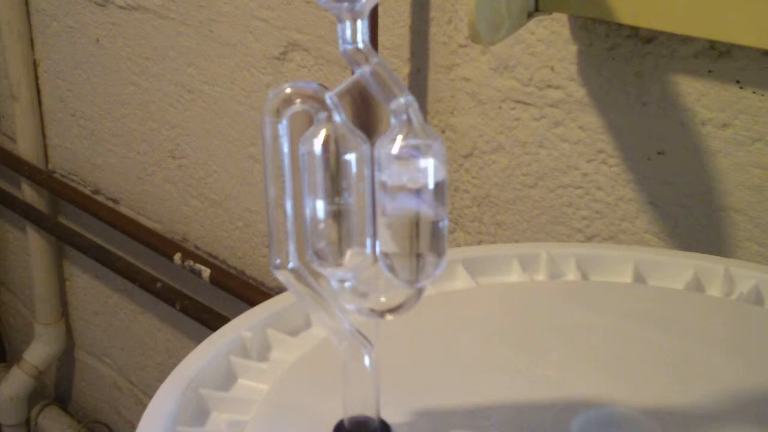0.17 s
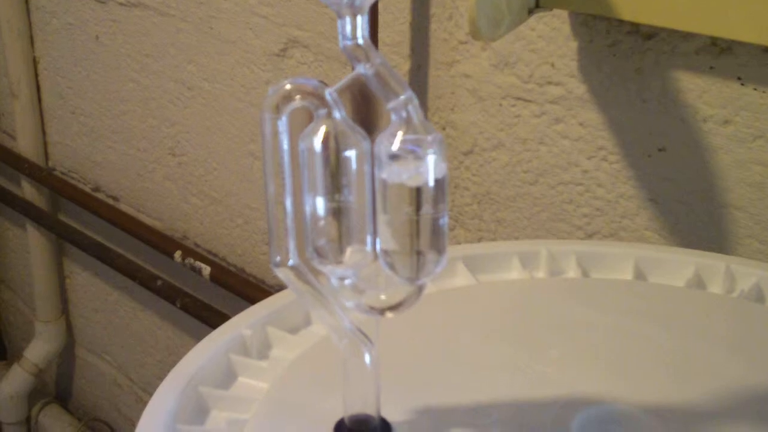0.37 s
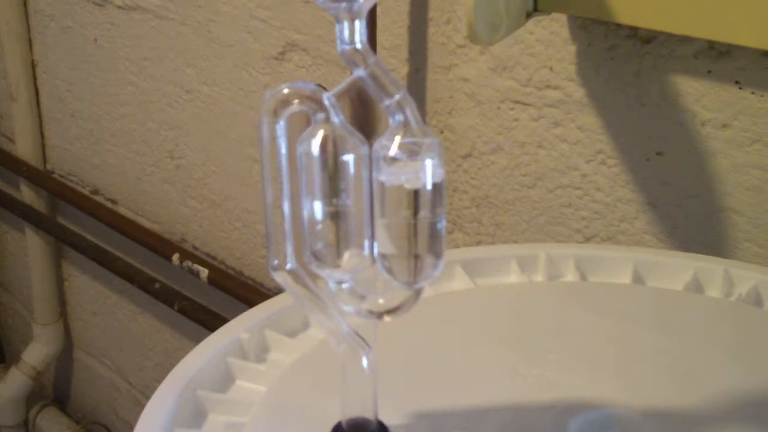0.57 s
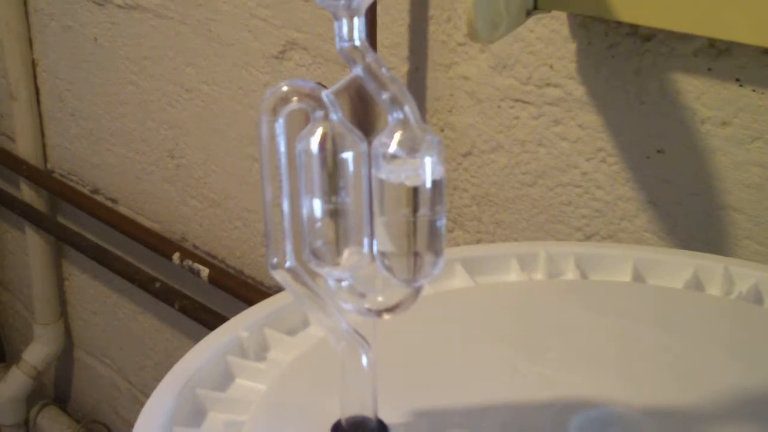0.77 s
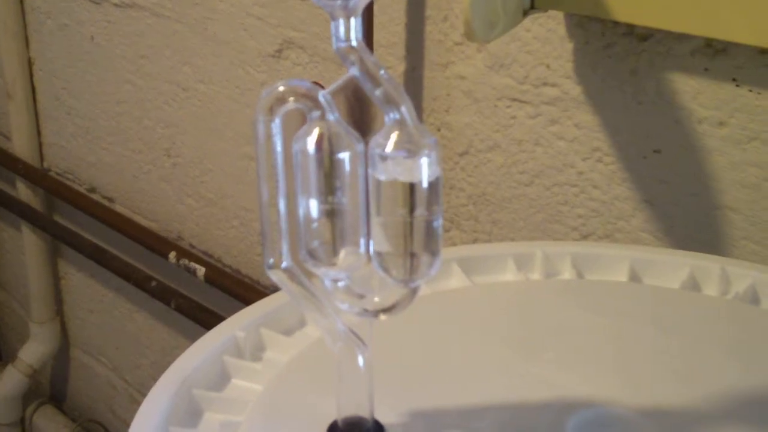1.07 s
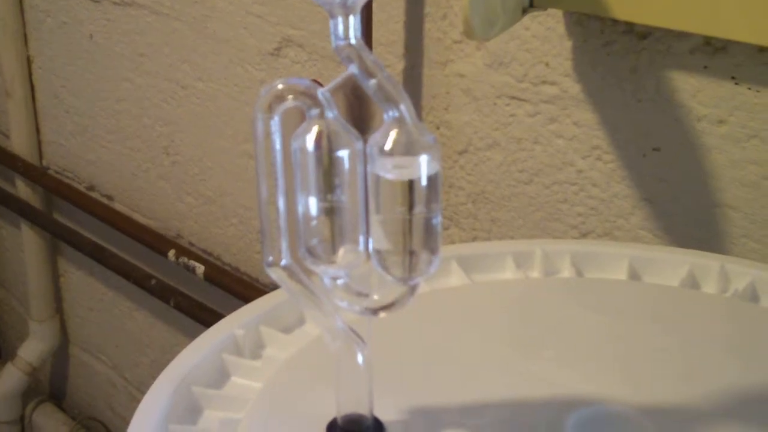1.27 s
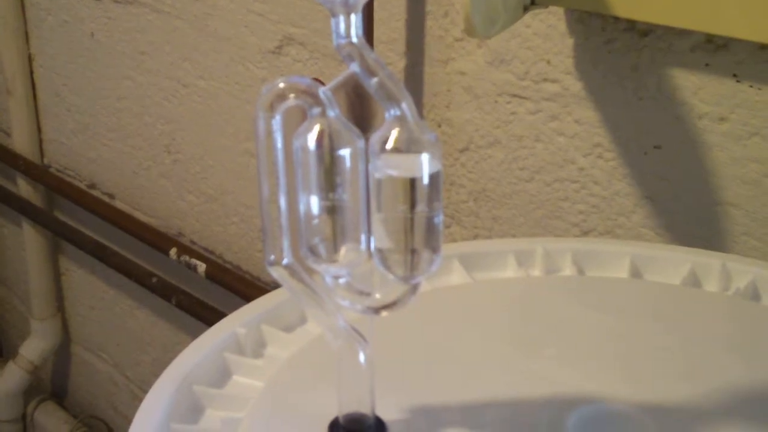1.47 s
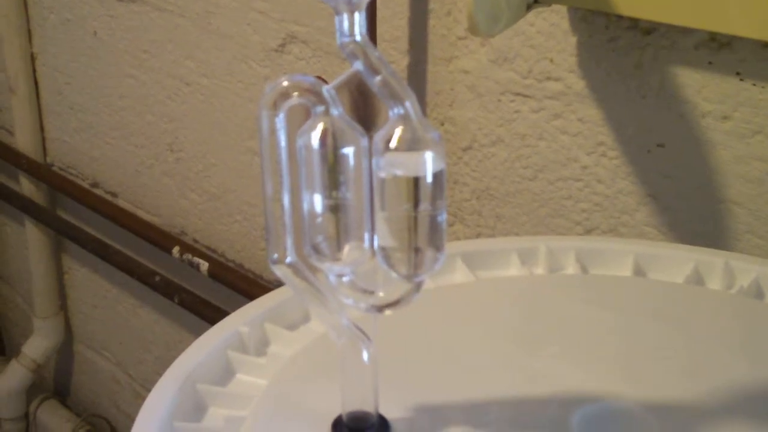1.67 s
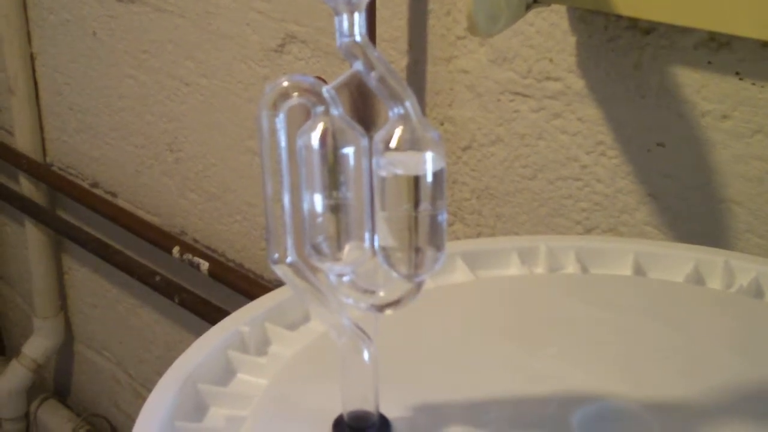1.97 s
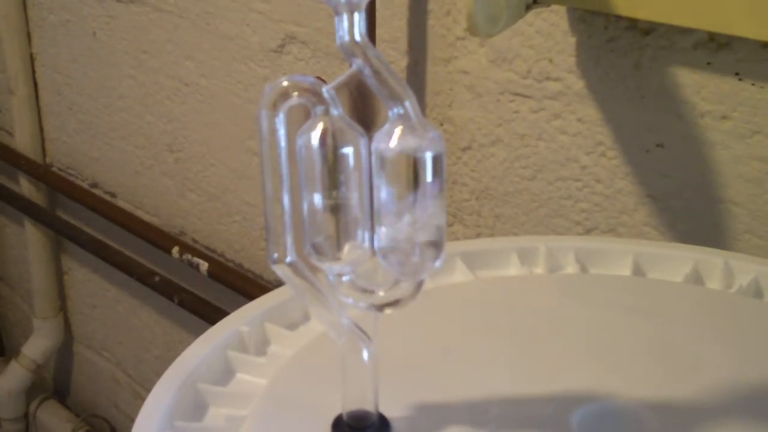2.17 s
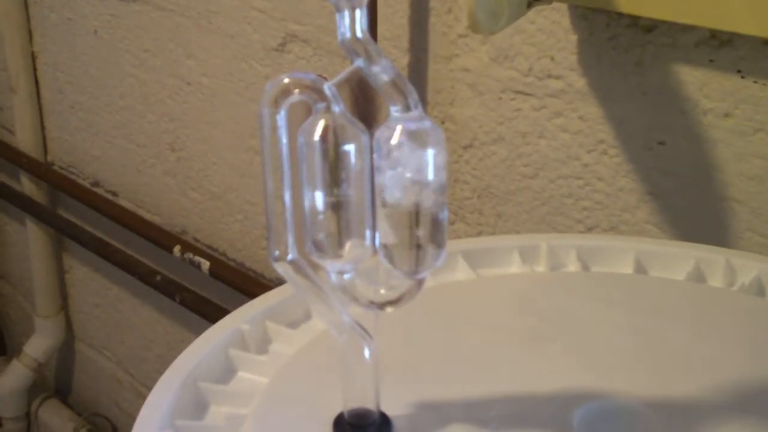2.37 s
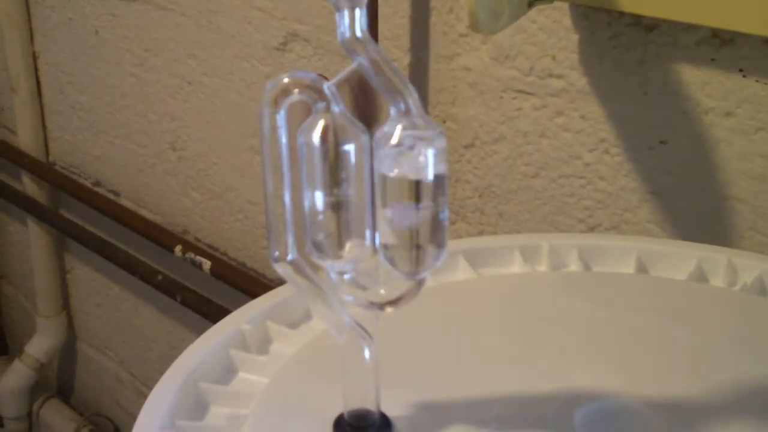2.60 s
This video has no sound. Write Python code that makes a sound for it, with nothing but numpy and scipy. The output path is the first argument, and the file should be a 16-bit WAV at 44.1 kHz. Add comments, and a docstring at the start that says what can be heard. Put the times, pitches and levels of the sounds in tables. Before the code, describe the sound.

A quick bubbling glug from a bucket's water trap, late in a quiet indoor utility room; beforehand only steady low rumble, thin electronic whine and ticking camera motor, heard through a small built-in mono microphone.

```python
"""Airlock burp over machine rumble

Gas leaves a fermenting bucket once: decaying low sines for the lid, rising sines for bubbles and froth.
A lens motor ticks and whirs as pulsed noise through body resonances; electronics add sines and hiss.
Shaped noise and narrow hums make the steady utility room. A small camera listens in mono, and the two
channels carry opposite offsets from the moment the sound switches on."""
import sys
import numpy as np
from scipy import signal
from scipy.fft import rfft, irfft
from scipy.io import wavfile

SR = 44100
rng = np.random.default_rng(int(sys.argv[2]) if len(sys.argv) > 2 else 0)


def invert_db(level):
    """Linear amplitude ratio for a level in decibels (20 dB per decade), elementwise."""
    return 10 ** (np.asarray(level, dtype=float) / 20)


def file_out(sig):
    """Save sig as 16-bit WAV at sys.argv[1]."""
    # one column per channel
    cols = np.atleast_2d(sig).T
    # limit, then scale
    lim = np.clip(cols, -1, 1)
    pcm = np.round(lim * 32767).astype(np.int16)
    wavfile.write(sys.argv[1], SR, pcm)


N = 120834  # samples
FRAMES_PER_S, FRAME_START_S = 29.97, .008  # the camera's frame clock


def rms_one(x):
    """Normalization: scale to unit root-mean-square."""
    return x / np.sqrt(np.mean(x ** 2) + 1e-20)


def drift(rate):
    """Low-pass random process: slow fluctuation with unit spread, computed every 40 samples."""
    r = np.exp(-80 * np.pi * rate / SR)
    noise = rng.standard_normal(N // 40 + 2002)
    slow = signal.lfilter([1], [1, -2 * r, r * r], noise)[2000:]  # the filter has settled
    return np.interp(np.arange(N) / 40, np.arange(len(slow)), rms_one(slow))


def resonate(x, hz, width):
    """Damped resonance: a two-pole filter with unit gain at its peak."""
    r = np.exp(-np.pi * width / SR)
    zeros = [(1 - r * r) / 2, 0, (r * r - 1) / 2]
    poles = [1, -2 * r * np.cos(2 * np.pi * hz / SR), r * r]
    return signal.lfilter(zeros, poles, x)


def body(x, peaks):
    """Modal superposition: parallel resonances, each passed twice, with alternating signs."""
    out = 0
    for k, (hz, width, db) in enumerate(peaks):
        mode = resonate(resonate(x, hz, width), hz, width)
        out = out + (-1) ** k * invert_db(db) * mode
    return out


def blips(rows, rise_s, t60_of, glide):
    """Damped free oscillation: sines swell and decay; frequency rises by 2 * glide of itself per second."""
    age = np.arange(SR // 2) / SR
    swell = 1 - np.exp(-(age / rise_s) ** 2)
    out = np.zeros(N + SR)
    for s, db, hz in rows:
        start = int(s * SR)
        decay = invert_db(db - 60 * age / t60_of(hz))
        tone = np.sin(2 * np.pi * hz * age * (1 + glide * age))
        out[start:start + len(age)] += decay * swell * tone
    return out[:N]


# Glugs of gas leaving the bucket: t/s, level/dB (before swell and decay), f/Hz
GLUG_EVENTS = [(2.230, -21, 152), (2.263, -46, 155), (2.284, -18.5, 156), (2.304, -21.5, 170),
               (2.334, -23.5, 170.6), (2.367, -18.5, 141.6), (2.393, -25, 143), (2.407, -18.5, 144),
               (2.437, -29, 157), (2.486, -26.5, 146)]


def bucket_lid():
    """Damped oscillation at constant frequency: low glugs of the bucket lid."""
    rise_s, t60_s = .007, .105
    return blips(GLUG_EVENTS, rise_s, lambda hz: t60_s, 0)


# Bubbles in the airlock chamber: t/s, level/dB (before swell and decay), starting f/Hz
BUBBLE_EVENTS = [(2.180, -28, 400), (2.200, -27, 686), (2.222, -28, 622), (2.236, -40, 388),
                 (2.283, -30, 1050), (2.287, -31.5, 384), (2.288, -26, 1275), (2.303, -32, 600),
                 (2.306, -28, 756), (2.320, -36, 907), (2.362, -27, 706), (2.378, -42, 544),
                 (2.412, -29, 558), (2.436, -42, 637)]
# Froth of small random bubbles: start t/s, length t/s, lowest f/Hz, highest f/Hz
FROTH = [(2.19, .055, 450, 900), (2.278, .04, 650, 1600), (2.352, .075, 480, 1000)]


def water_trap():
    """Bubble resonance with constant decay in cycles: clear bubbles and bursts of froth in the airlock."""
    rise_s, cycles_to_60_db, glide_per_s = .008, 45.0, .5
    froth_db, spread_db = -37.5, 1  # spread per natural-log unit of size
    froth = []
    for s, length, low_hz, high_hz in FROTH:
        for when, size, pitch in rng.random((24, 3)):
            db = froth_db + spread_db * np.log(size)
            hz = low_hz * (high_hz / low_hz) ** pitch
            froth.append((s + length * when, db, hz))
    return blips(BUBBLE_EVENTS + froth, rise_s, lambda hz: cycles_to_60_db / hz, glide_per_s)


# Lens motor runs: start t/s, length t/s
MOTOR_RUNS = [(.408, .645), (1.140, .027), (1.258, .028), (1.349, .166), (1.558, .022), (1.747, .035),
              (1.858, .027), (1.958, .024), (2.255, .029), (2.350, .085), (2.556, .029)]
# Camera body driven by the running motor: f/Hz, width/Hz (each pass), relative level/dB
RUNNING_MODES = [(6300, 800, -8), (7780, 400, -4), (8280, 500, 0), (9350, 800, -11), (11050, 1100, -3.5),
                 (12750, 600, 3), (14050, 700, -13)]
# Lag of each of those resonances within a step: t/s
MODE_LAGS = [.005, .001, .001, .007, .006, .0007, .0005]


def motor_running():
    """Amplitude modulation: steps and their teeth pulse the noise that drives the body resonances."""
    run_db, edge_s, steps_per_s = -50.5, .003, 134
    step_depth_db, teeth_depth_db = 5.5, 3.0
    t = np.arange(N) / SR
    gate = 0
    for s, length in MOTOR_RUNS:
        gate = gate + np.clip(np.minimum(t - s, s + length - t) / edge_s + .5, 0, 1)
    turn = 2 * np.pi * steps_per_s * (t - np.c_[MODE_LAGS])  # one row per resonance
    step_db = step_depth_db * np.cos(turn)
    teeth_db = teeth_depth_db * np.cos(3 * turn)  # three teeth a step
    rattle = invert_db(step_db + teeth_db + 0.5 * drift(65)) * rng.standard_normal(N)
    modes = sum((-1) ** k * body(rattle[k], [peak]) for k, peak in enumerate(RUNNING_MODES))
    return invert_db(run_db) * gate * rms_one(modes)


# Ticks after the start of each frame, before jitter: t/s
FRAME_TICKS = [0, .0075, .0125, .023]
# Camera body under the idling motor: f/Hz, width/Hz (each pass), relative level/dB
IDLING_MODES = [(6140, 1230, -3.5), (7780, 1050, -2), (8400, 750, -1), (9290, 540, -6.5), (11100, 1750, -8),
                (12850, 1550, -1), (13700, 600, -32)]


def motor_idling():
    """Impulsive excitation: decaying ticks in every frame modulate noise through the body resonances."""
    idle_db, jitter_s = -55, .0012
    tick_db, tick_spread_db, tick_t60_s = 10.5, 3.5, .0067  # tick level relative to the steady noise
    frames = FRAME_START_S + np.arange(83) / FRAMES_PER_S
    at = (frames[:, None] + FRAME_TICKS).ravel()
    at = at + jitter_s * rng.standard_normal(len(at))
    ticks = np.zeros(N + SR)
    ticks[(at * SR).astype(int)] = invert_db(tick_db + tick_spread_db * rng.standard_normal(len(at)))
    decay_per_sample = invert_db(-60 / (tick_t60_s * SR))
    shake = 1 + signal.lfilter([1], [1, -decay_per_sample], ticks[:N])
    return invert_db(idle_db) * rms_one(body(shake * rng.standard_normal(N), IDLING_MODES))


# Steady tones of the electronics: f/Hz, level/dB (rms)
STEADY_TONES = [(6000, -75), (7492.5, -69), (8230, -78), (11000, -77), (12000, -78), (13000, -80),
                (14000, -82)]
# Chirp level in a cycle of three frames: relative level/dB
CHIRP_CYCLE = [0, -6, -9]


def electronics():
    """Periodic gating: a whine and a fixed-frequency chirp follow the frames, over steady tones and hiss."""
    whine_hz, whine_db, whine_gap_s = 14985, -67, .009  # silent at the start of each frame
    chirp_hz, chirp_db, chirp_spread_db, chirp_length_s = 7867, -56.5, 3.5, .014
    chirp_rest_db, hiss_db = -69, -58.5  # the chirp tone never falls below its rest level
    t = np.arange(N) / SR
    frame, part = np.divmod((t - FRAME_START_S) * FRAMES_PER_S, 1)
    frame = frame.astype(int)
    into = part / FRAMES_PER_S  # seconds into the frame

    to_edge = np.minimum(into - whine_gap_s, 1 / FRAMES_PER_S - into)
    gate = np.clip(to_edge / .001, 0, 1)  # 1 ms ramps
    whine = invert_db(whine_db) * gate * np.sin(2 * np.pi * whine_hz * t)

    strength = invert_db(chirp_db + chirp_spread_db * rng.standard_normal(90))[frame]
    strength = strength * invert_db(np.take(CHIRP_CYCLE, frame % 3))
    swell = np.sin(np.pi * np.clip(into / chirp_length_s, 0, 1))
    chirp = (invert_db(chirp_rest_db) + strength * swell) * np.sin(2 * np.pi * chirp_hz * t)

    tones = sum(invert_db(db) * np.sin(2 * np.pi * (hz * t + rng.random())) for hz, db in STEADY_TONES)
    sines = np.sqrt(2) * (whine + chirp + tones)  # rms to peak
    return sines + invert_db(hiss_db) * rng.standard_normal(N)


# Narrow hums of machines: f/Hz, width/Hz (each of two passes), level/dB (rms)
MACHINE_HUMS = [(17.5, 3, -39), (160, 12, -56), (641, 30, -57), (768, 10, -62), (903, 20, -63),
                (1138, 1, -58), (1501, 8, -68)]


def machine_hums():
    """Narrow-band filtering: resonances turn noise into hums of wavering level."""
    out = 0
    for hz, width, db in MACHINE_HUMS:
        hum = body(rng.standard_normal(N + SR), [(hz, width, 0)])[SR:]  # first second settles
        out = out + invert_db(db) * rms_one(hum)
    return out


# Spectrum of the room noise: f/Hz, relative level/dB (per Hz)
ROOM_SPECTRUM = [(5, -2.5), (10, -2), (24, -5.5), (30, -11), (44, -26.5), (58, -12), (67, -3.5), (80, -7),
                 (115, -14), (156, -11.5), (198, -14), (219, -24), (263, -18.5), (291, -22.5), (358, -20),
                 (386, -27), (439, -21), (519, -21), (568, -22.5), (629, -22), (926, -22.5), (1080, -26),
                 (1170, -24), (1590, -31), (4560, -40), (5600, -47), (7280, -58), (12300, -120)]


def room_air():
    """Spectral shaping: white noise is weighted by the room's spectrum on a log-frequency axis."""
    hz, db = np.transpose(ROOM_SPECTRUM)
    grid = np.arange(N // 2 + 1) * SR / N + 1  # 1 Hz up, to avoid log 0
    weight = invert_db(np.interp(np.log(grid), np.log(hz), db))
    return invert_db(-37) * rms_one(irfft(rfft(rng.standard_normal(N)) * weight, N))


def scene():
    """Linear superposition: all sources add at one microphone, which feeds both channels."""
    burp = bucket_lid() + water_trap()
    camera = motor_running() + motor_idling() + electronics()
    room = machine_hums() + room_air()
    return np.tile(burp + camera + room, (2, 1))


# Notches of the microphone housing: f/Hz, width/Hz, depth (0 to 1)
HOUSING_NOTCHES = [(5500, 500, .45), (8820, 300, .55), (9950, 300, .4), (12150, 750, .65),
                   (13600, 300, .35)]


def housing(x):
    """Resonant cancellation: subtracting each resonance cuts a notch at its frequency."""
    for hz, width, depth in HOUSING_NOTCHES:
        x = x - depth * resonate(x, hz, width)
    return x


def band_limit(x):
    """A steep low-pass at the top of the band."""
    return signal.sosfilt(signal.butter(12, 16220, fs=SR, output="sos"), x)


def record(dry):
    """Band limiting and constant bias: notches, a steep treble cut, offsets and an abrupt switch-on."""
    cutoff_hz, offset, on_s = 15330, .0569, .1059
    treble_cut = signal.cheby2(24, 35, cutoff_hz, fs=SR, output="sos")  # 35 dB down from the cutoff
    x = signal.sosfilt(treble_cut, housing(dry))
    x = x + offset * np.array([[-1], [1]])  # left below zero, right above
    switched_on = np.arange(N) >= on_s * SR
    return band_limit(x * switched_on)


dry = scene()
out = record(dry)
file_out(out)
```